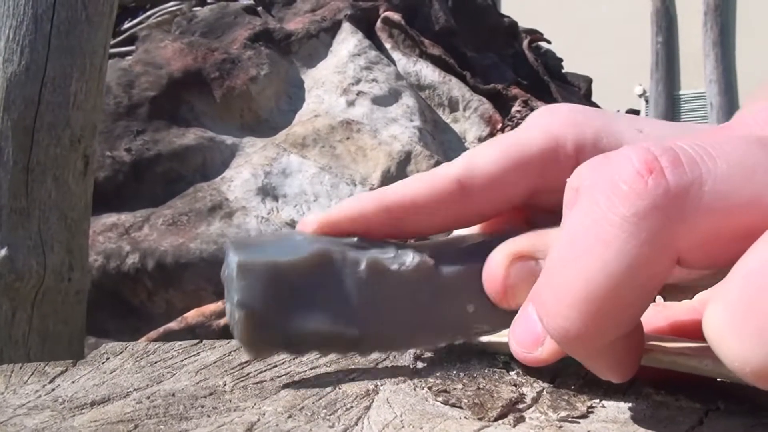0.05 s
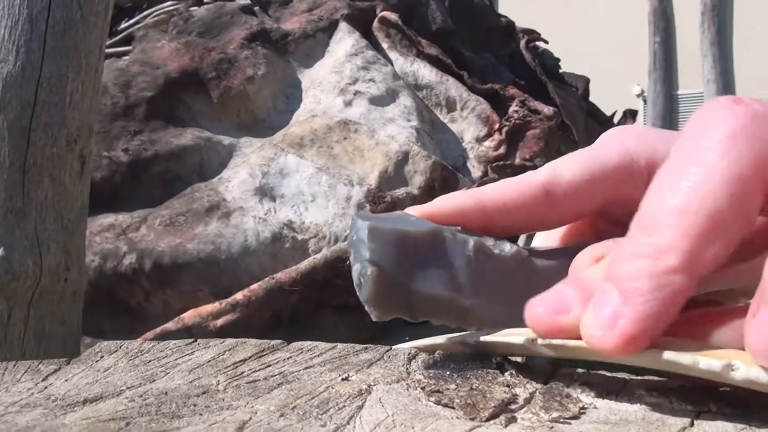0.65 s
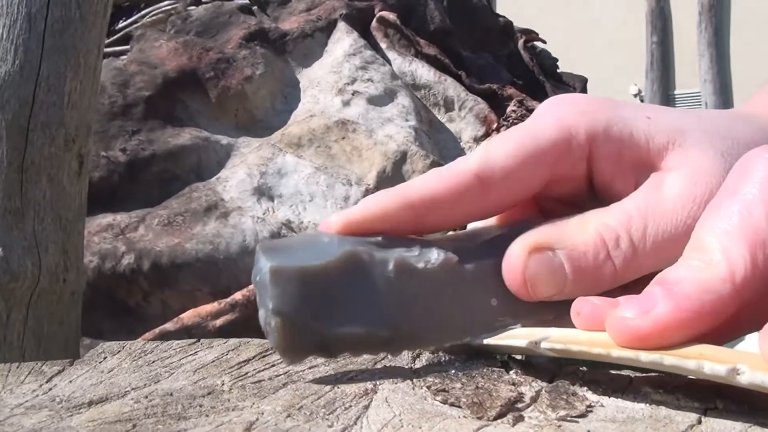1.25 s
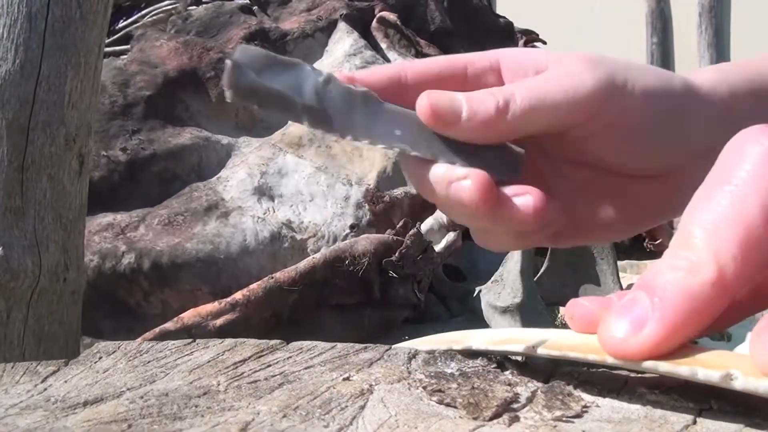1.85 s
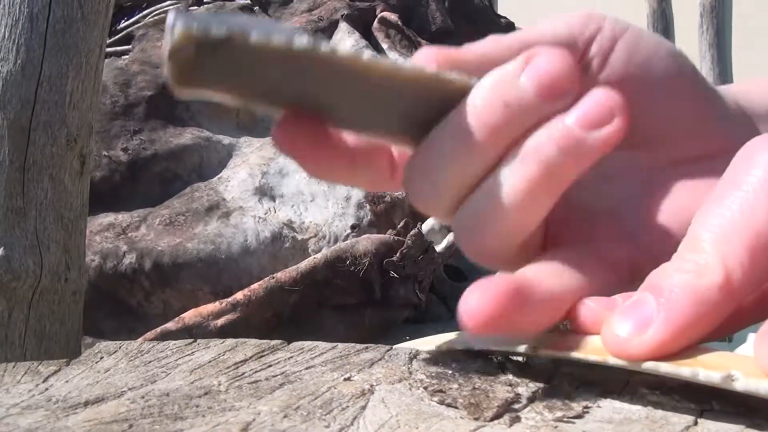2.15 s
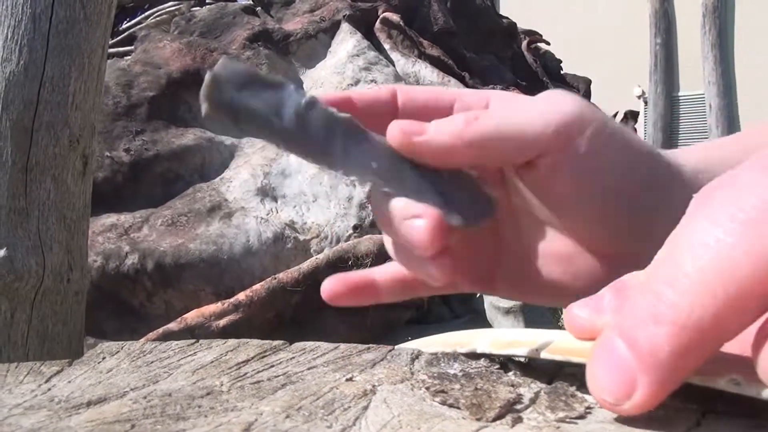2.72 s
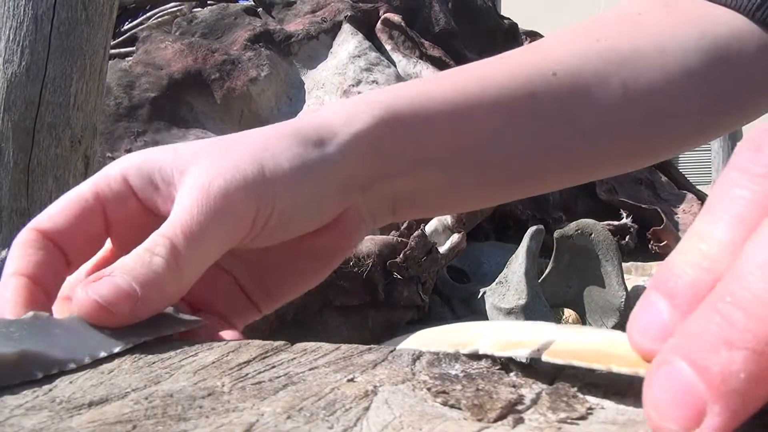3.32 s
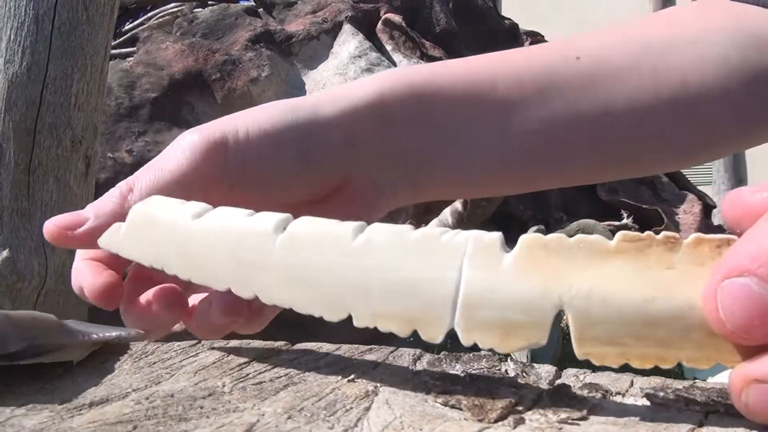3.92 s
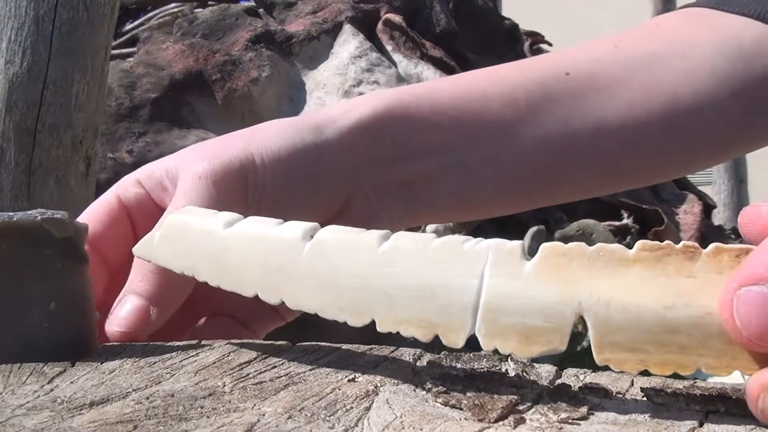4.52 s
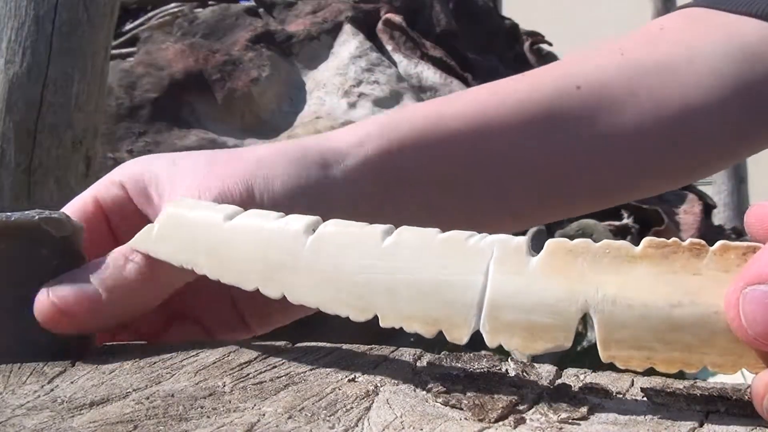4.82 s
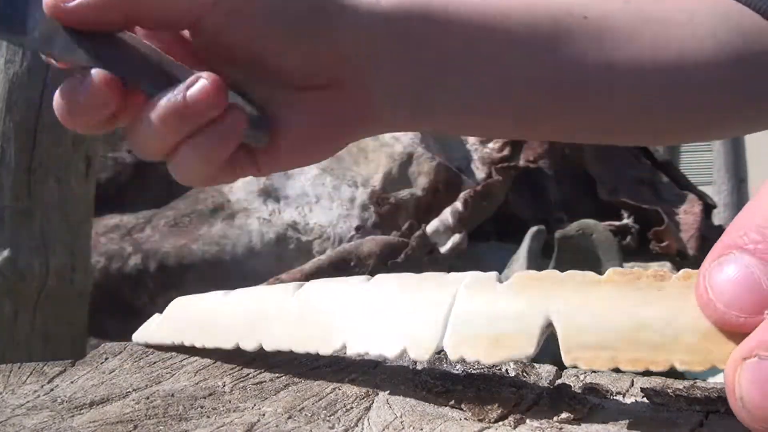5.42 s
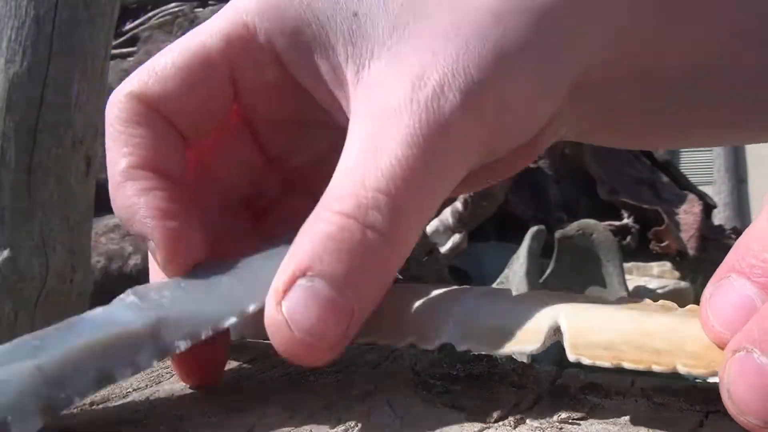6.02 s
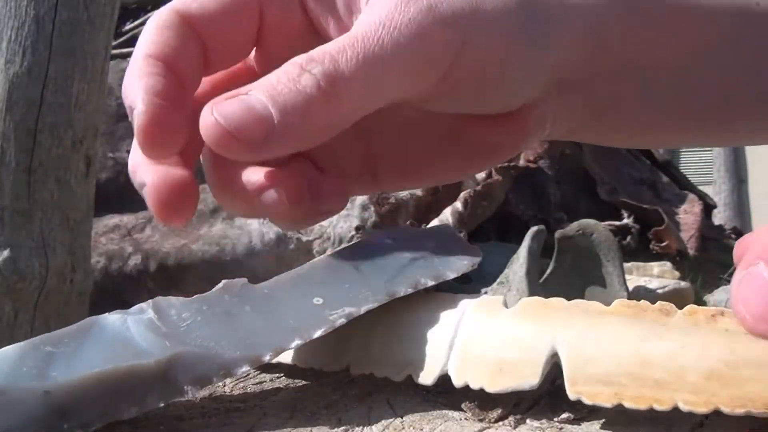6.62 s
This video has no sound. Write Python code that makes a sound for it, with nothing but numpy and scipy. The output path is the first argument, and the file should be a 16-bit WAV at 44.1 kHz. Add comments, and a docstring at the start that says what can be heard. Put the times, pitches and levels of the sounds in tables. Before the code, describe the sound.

A toothed flint blade saws a thin strip on a tree stump, heard close up over a quiet outdoor hush. From the start, about ten quick, gritty rasps snag and tear, with a brief pause near 0.7 seconds, ending at about 1.8 seconds. Faint rubbing of fingers on stone, dull hand bumps and scattered small ticks follow. From 3 seconds the blade clicks down on the wood and rocks to rest. Between 3.8 and 4.3 seconds it is dragged over the stump, juddering with grit, short woody groans and thin high squeaks. A strong hollow knock comes at about 5 seconds, and another knock with a sharp stone click near 5.5 seconds. Light ticks and faint squeaks continue, then the blade is set down with a cluster of sharp clicks and light knocks around 6.2 to 6.3 seconds.

```python
"""A toothed flint blade saws a thin strip held on a tree stump, outdoors.
In about ten quick strokes its teeth snap fibres, which makes the blade rasp. Then the blade is
lifted, laid down, dragged juddering over the stump, picked up and set down again.
The stone ticks and squeaks, fingers rub it, and the stump answers knocks with a short hollow note."""
import sys
import numpy as np
from scipy import signal
from scipy.fft import irfft
from scipy.io import wavfile
from scipy.ndimage import uniform_filter1d

SR = 44100
rng = np.random.default_rng(int(sys.argv[2]) if len(sys.argv) > 2 else 0)


def pcm_store(signal):
    """Save signal as 16-bit PCM."""
    levels = np.round(np.clip(np.atleast_2d(signal), -1, 1) * 32767)
    wavfile.write(sys.argv[1], SR, levels.astype(np.int16).T)


N = 293695
TIME = np.arange(N) / SR
BINS = np.fft.rfftfreq(4096, 1 / SR)


def amp(db):
    """Turn decibels into a gain."""
    return 10 ** (np.asarray(db) / 20)


def unit(x):
    """Scale a signal to an average power of 1."""
    return x / np.sqrt(np.mean(x ** 2) + 1e-20)


def curve(points):
    """Join (frequency, value) points into a curve over BINS."""
    hz, value = np.transpose(points)
    return np.interp(np.log(BINS + 1), np.log(hz + 1), value)


def add(mix, start, sound):
    """Mix in a sound at a start time in seconds."""
    part = mix[max(round(start * SR), 0):][:len(sound)]
    part += sound[:len(part)]


def through(x, response):
    """Let a signal set an object ringing."""
    return signal.oaconvolve(x, response)[:len(x)]


def fade(rows, column=1):
    """Gain that follows a table's dB column over time, silent before and after."""
    times, db = np.array(rows)[:, [0, column]].T
    gain = amp(np.interp(TIME, times, db)) * (TIME >= times[0]) * (TIME <= times[-1])
    return uniform_filter1d(gain, size=130)


def body(colour, notes=(), tilt_db=0):
    """How an object answers one click: a broad tone colour with ringing notes on top."""
    lift = 1 + sum((amp(db) ** 2 - 1) / (1 + (2 * (BINS - hz) / width) ** 2) for hz, width, db in notes)
    gain = amp(curve(colour) + tilt_db * np.log2(np.maximum(BINS, 700)))
    gain *= np.sqrt(np.maximum(lift, 1e-3))
    log_gain = np.log(np.r_[gain, gain[-2:0:-1]] / gain.max() + 1e-5)
    spectrum = np.exp(signal.hilbert(log_gain).conj())  # nothing rings before the click
    response = np.fft.ifft(spectrum).real[:len(BINS)]
    return response / np.linalg.norm(response)


def grains(count, per_s, spread_db):
    """Tiny clicks of random size at random moments."""
    chance, size, sign = rng.random((count, 3)).T
    return (chance < per_s / SR) * amp(spread_db * np.minimum(-np.log(1 - size), 3)) * np.sign(sign - .5)


def waver(count, hz):
    """A random wobble that changes about hz times a second."""
    knots = rng.standard_normal(N // 20)
    return np.interp(np.arange(count) * hz / SR, np.arange(len(knots)), knots) * np.sqrt(3 / 2)


# saw strokes: t/s, length/s, rise/s, level/dB, change over the stroke/dB, push on wood/dB, edge bite/dB
SAW_STROKES = [ (.002, 0.084, 0.017, -20, -3.5, 6, 0.5), (0.134, 0.081, 0.0044, -22, 2.5, 7.5, -4),
               (0.272, 0.099, 0.013, -21.5, 1, 3, -1), (0.408, 0.092, 0.024, -21, 2, 7, -2),
               (0.546, 0.073, 0.016, -27.5, 0.5, -1.5, -3.5), (0.624, 0.14, .004, -38, -9, 8, 0),
               (0.893, 0.076, 0.0084, -25.5, -2, 5, 0), (1.02, 0.084, 0.025, -20, 0, 7, -3),
               (1.126, 0.013, 0.0048, -23.5, -2.5, 8, -3.5), (1.192, 0.091, 0.0054, -13.5, -8, 1, -3.5),
               (1.338, 0.09, 0.031, -15, -5.5, 7.5, -3.5), (1.647, 0.041, 0.037, -20.5, 1.5, 3.5, -14),
               (1.704, 0.015, 0.0022, -21, 1, -5.5, 4.5)]


def strokes(fibre_stop_s=.075, edge_stop_s=.049, wood_stop_s=.13):
    """The force on fibres, edge and wood: each stroke builds up; the edge lets go first, the wood last."""
    fibre, edge, wood = np.zeros((3, N))
    creep = signal.windows.tukey(int(1.76 * SR), .1)  # between strokes the blade creeps in its groove
    add(fibre, 0, amp(-44.5) * creep)
    add(wood, 0, amp(-53) * creep)
    t = TIME[:SR // 3]
    for start, length, rise, db, change_db, wood_db, edge_db in SAW_STROKES:
        effort_db = db - 16 * np.maximum(1 - t / rise, 0) + change_db * np.minimum(t / length, 1)
        fall = 60 * np.maximum(t - length, 0)  # 60 dB down after each stop time
        add(fibre, start, amp(effort_db - fall / fibre_stop_s))
        add(edge, start, amp(effort_db + edge_db - fall / edge_stop_s))
        add(wood, start, amp(effort_db + wood_db - fall / wood_stop_s))
    return uniform_filter1d(np.array([fibre, edge, wood]), size=130, axis=1)


def catches(typical_per_s=45, relax_s=.0017):
    """Gain that jumps as each tooth catches, at an uneven pace, and relaxes."""
    teeth = np.cumsum(typical_per_s * np.exp(.32 * waver(N, typical_per_s))) / SR
    return 1 + amp(2.5) * np.exp(-(teeth % 1) / typical_per_s / relax_s)


# a tooth snags hard and tears free: t/s, level/dB, edge bite/dB
TOOTH_SNAGS = [(.043, -16, -16), (.083, -19, 7.5), (.144, -20, -12), (.185, -10, -1), (.228, -11, -7.5),
               (.288, -26, 16), (.324, -12, -15.5), (.457, -19, -2), (.502, -14.5, -6), (.579, -12.5, -2),
               (.590, -14.5, 3), (.631, -32, 4), (.662, -20.5, -13.5), (.896, -21.5, -3.5), (.948, -26, 3),
               (.991, -45, 14.5), (1.062, -12.5, -3.5), (1.084, -13, -1.5), (1.100, -11, -8.5),
               (1.152, -25.5, 10), (1.227, -18.5, 6.5), (1.2913, -19.5, 11.5), (1.385, -8, -4.5),
               (1.407, -11, -3.5), (1.435, -11.5, -6.5), (1.473, -16.5, 3), (1.517, -22.5, 9.5),
               (1.598, -34.5, 3.5), (1.622, -31.5, 2), (1.6785, -16.5, -1.5), (1.707, -12.5, -0.5)]
# tone colours of the rasp and of the stump under it: f/Hz, level/dB
RASP_COLOUR = [(500, -16), (850, 8.5), (926, -19), (1050, 3), (1270, 2.5), (2320, 0.5), (3690, -10),
               (4770, -10), (5590, -12.5), (7490, -18), (10300, -22.5), (15800, -40.5)]
WOOD_COLOUR = [(32, -26), (105, -18), (230, -9), (340, -13.5), (460, -6.5), (620, -6), (840, -0.5),
               (1120, -28.5), (2100, -45.5)]
# notes of the blade pressed on the strip, and of the hollow-sounding stump: f/Hz, width/Hz, boost/dB
BLADE_NOTES = [(1028, 38, 8.5), (2040, 160, 2), (2190, 110, -3), (4710, 360, 10.5), (10240, 200, 6)]
WOOD_NOTES = [(566, 20, 17), (780, 28, 6.5)]


def sawing(tear_s=.0021, split_hz=3400):
    """Teeth snap fibres in clumps; the snaps ring the blade and, through the strip, the stump."""
    snaps = grains(N, per_s=9500, spread_db=3.5)
    clumps = amp(4 * waver(N, hz=310))
    fibre, edge, wood = amp([[-3.5], [-4], [-3.5]]) * unit(snaps * clumps * catches()) * strokes()
    age = TIME[:SR // 30] / tear_s
    for start, db, bite_db in TOOTH_SNAGS:
        tear = grains(len(age), per_s=12500, spread_db=-.5) * (age + .5) * np.exp(-2 * age)
        tear *= amp(db - 3) * np.sqrt(tear_s * SR) / np.linalg.norm(tear)
        add(fibre, start, tear)
        add(edge, start, amp(bite_db) * tear)
        add(wood, start, amp(-bite_db / 2) * tear)  # a glancing bite pushes the wood less
    rasp = body(RASP_COLOUR, BLADE_NOTES)
    out = through(wood, body(WOOD_COLOUR, WOOD_NOTES))
    for force, band in ((fibre, "low"), (edge, "high")):
        part = signal.sosfilt(signal.butter(3, split_hz, band, fs=SR, output="sos"), rasp)
        out += through(force, part / np.linalg.norm(part))
    return out


# tone colour of the outdoor background: f/Hz, level/dB
AIR_COLOUR = [(25, -37), (55, -1.5), (110, -1.5), (250, -8.5), (560, -7), (1100, -14), (2500, -16.5),
              (5000, -25), (8000, -26.5), (15800, -31)]


def air(level_db=-54):
    """A quiet outdoor hush with a faint low drone, partly shared by left and right."""
    shared, left, right = rng.standard_normal((3, N))
    colour = body(AIR_COLOUR, notes=[(73, 12, 8)])
    pair = np.array([through(shared + own, colour) for own in (left, right)]) * amp([[-2], [1.5]])
    return amp(level_db) * pair / pair.mean(0).std()


# the hands bump the stump: t/s, level/dB
HAND_BUMPS = [(0.628, -28.5), (.69, -25), (.724, -26), (.21, -27), (0.331, -26), (.47, -28), (1.215, -24.5),
              (1.289, -20), (1.504, -26), (1.534, -29), (1.805, -22), (1.898, -38.5), (2.212, -32),
              (2.569, -35.5), (2.656, -32.5), (3.069, -27), (3.176, -41), (4.157, -29), (4.233, -20.5),
              (4.443, -34.5), (4.651, -34), (4.721, -35.5)]
# tone colour of a bump: f/Hz, level/dB
THUD_COLOUR = [(26, -33), (72, 3), (125, -1.5), (265, 3.5), (410, -16.5), (880, -11), (2400, -40.5)]


def bumps(die_away_s=.14):
    """Soft, dull pushes of the hands die quickly in the heavy stump."""
    out, t, dull = np.zeros(N), TIME[:SR // 8], body(THUD_COLOUR)
    for start, db in HAND_BUMPS:
        push = rng.standard_normal(len(t)) * amp(-60 * t / die_away_s)
        add(out, start, amp(db - 7) * unit(through(push, dull)) / 2)
    return out


# fingers rub the stone, in a pause of the saw and after the sawing: t/s, level/dB
PAUSE_RUB = [(.66, -40.5), (.82, -56), (1.0, -59)]
LATER_RUB = [(1.86, -48), (2.0, -66.5), (2.27, -61), (2.4, -57), (2.77, -51), (3.08, -54), (3.87, -56.5),
             (4.02, -48), (4.09, -48.5), (4.23, -53.5), (4.46, -51), (4.82, -53), (4.96, -59), (5.25, -56),
             (5.62, -56), (6.05, -71), (6.21, -51), (6.62, -67)]
# tone colour of the rubbing: f/Hz, level/dB
RUB_COLOUR = [(330, 4.5), (1400, 0.5), (3000, -3), (4800, -5), (6000, -9), (9000, -20.5), (15800, -22.5)]
# notes of the rubbed blade: f/Hz, width/Hz, boost/dB
RUB_NOTES = [(4640, 300, 5), (10280, 250, 5)]


def rubbing():
    """Skin slides on the stone with a faint, fluttering hiss, in which the blade rings a little."""
    skin = unit(grains(N, per_s=9500, spread_db=5.5)) * amp(5 * waver(N, hz=26))
    return through(skin * (fade(PAUSE_RUB) + fade(LATER_RUB)), body(RUB_COLOUR, RUB_NOTES))


# stone knocks on the stump, and the strip taps it: t/s, level/dB, hardness/dB per octave
STUMP_KNOCKS = [(1.473, -31, 18), (1.517, -40, 25.5), (2.214, -36, 10), (2.28, -33, 6),
                (3.070, -32.5, 15.5), (3.120, -38.5, -11), (3.291, -26, 9), (3.299, -19, -3.5),
                (3.447, -33, 2), (3.921, -13.5, -8), (4.158, -33.5, 10), (4.211, -22, -16),
                (4.256, -27, 14), (4.652, -35.5, 10), (4.717, -27.5, 11.5), (4.943, -26.5, -3),
                (4.959, -25.5, -22), (4.98, -5.5, -8), (5.4647, -17, 11.5), (5.478, -21, 6),
                (5.700, -33, -4), (5.815, -30.5, 8), (6.100, -37, 10), (6.161, -37, -6), (6.228, -24.5, 6),
                (6.279, -37, 8), (6.316, -28, 13)]
STRIP_TAPS = [(1.473, -42, 16), (2.480, -44, -3), (2.569, -43, 4.5), (2.658, -40, 6), (2.683, -28.5, -3),
              (3.070, -39.5, 8.5), (3.447, -36.5, 8.5), (4.716, -30, -4), (5.4647, -38, 17)]
# notes of the struck stump and strip: f/Hz, level/dB, time to fade by 60 dB/s
STUMP_NOTES = [(411, -13.5, 0.089), (548, -0.5, 0.14), (572.8, -5.5, 0.13), (644, -11, 0.082),
               (862, -18.5, 0.11), (942.6, -9, 0.033), (1490, -22.5, 0.025), (1850, -26.5, 0.024)]
STRIP_NOTES = [(670, -5, .07), (787, 3, 0.077), (1030, -15.5, .04), (1420, -6, 0.01), (1780, -7, 0.023)]


def knocks(blows, notes, gain_db, swell_cycles=1.7):
    """Each blow rings an object's notes, which swell and fade; harder blows favour the high ones."""
    out, t = np.zeros(N), TIME[:SR // 4]
    for start, db, hardness_db in blows:
        for hz, note_db, fade_s in notes:
            ring = amp(note_db + hardness_db * np.log2(hz / 550) - 60 * t / fade_s)
            swell = 1 - np.exp(-t * hz / swell_cycles)
            add(out, start, amp(db + gain_db) * ring * swell * np.sin(2 * np.pi * hz * t))
    return out


# the flint ticks and scratches: t/s, level/dB, slide length/s, brightness/dB per octave
FLINT_TICKS = [(1.833, -29, 0.0022, 9), (2.226, -39.5, 0.056, 5.5), (2.268, -22.5, 0.02, 2),
               (2.458, -39, 0.0023, 10.5), (2.569, -34.5, 0.0085, -6.5), (2.660, -43.5, 0.075, 7),
               (2.8, -44.5, 0.0046, -4), (3.071, -34, 0.0044, .5), (3.290, -35, .016, -7.5),
               (3.336, -36, 0.0038, 9.5), (3.348, -27.5, 0.0024, 0.5), (3.414, -30, 0.0053, 4),
               (3.447, -23, 0.0024, 7), (3.45, -25.5, .012, -2), (4.941, -40.5, 0.023, -5),
               (5.4655, -19.5, 0.00075, -2), (5.478, -32, 0.0013, 9), (5.696, -35, 0.009, 5),
               (5.813, -30, 0.0094, 3), (6.032, -36.5, 0.0015, -0.5), (6.2288, -9, 0.0013, -0.5),
               (6.272, -37, 0.05, -5.5), (6.28, -24.5, .003, 0), (6.292, -26.5, .002, 7),
               (6.314, -18, 0.0011, 9.5), (6.318, -22.5, 0.011, 3.5)]
# tone colour of the loose blade: f/Hz, level/dB
FLINT_COLOUR = [(110, -12), (620, -5.5), (1750, -3), (3400, -2.5), (5700, -6.5), (8100, -18), (12100, -24),
                (15900, -30.5)]
# its notes: f/Hz, width/Hz, boost/dB
FLINT_NOTES = [(3428, 140, 7.5), (4510, 33, 6.5), (5120, 124, 6.5), (5880, 220, 3), (7180, 160, 3.5)]


def ticks():
    """A sharp touch and a short gritty slide ring the loose blade."""
    out = np.zeros(N)
    for start, db, length, bright_db in FLINT_TICKS + stray_ticks():
        slide = grains(SR // 10, per_s=8600, spread_db=6.5)[:max(int(length * SR), 2)]
        slide[0] += 3  # the first touch
        tick = signal.fftconvolve(slide, body(FLINT_COLOUR, FLINT_NOTES, bright_db))
        tick *= np.sqrt((length + .00052) * SR) / np.linalg.norm(tick)  # longer slides carry more energy
        add(out, start, amp(db - 1) * tick)
    return out


# the fingers shift their grip: from t/s, to t/s
GRIP_SHIFTS = [(2.3, 3.55), (5.601, 7.2)]


def stray_ticks(per_s=6, slide_s=.0027, bright_db=8):
    """Extra rows for ticks(): faint touches at random moments while the grip shifts."""
    return [(start + when * (end - start), -38.5 - 10 * softness, slide_s, bright_db)
            for start, end in GRIP_SHIFTS
            for when, softness in rng.random((40, 2))[:int(per_s * (end - start))]]


def slip(hz, jitter_hz, shimmer_db, overtone_db):
    """Sticking and slipping in quick turns makes an unsteady, nearly pure tone."""
    phase = 2 * np.pi * np.cumsum(hz + jitter_hz * waver(len(hz), 300)) / SR
    wave = np.sin(phase) + amp(overtone_db) * np.sin(2 * phase)
    return unit(wave * amp(shimmer_db * waver(len(hz), 200)))


# the slips lock on to a note of the stump: t/s, length/s, f/Hz, level/dB
GROANS = [(3.297, 0.013, 569, -18), (3.469, 0.032, 543, -28), (3.84, 0.066, 557, -25),
          (3.912, 0.054, 575, -24), (3.973, 0.22, 558, -35.5), (4.081, 0.061, 572, -16.5),
          (4.147, 0.029, 550, -19), (4.231, 0.0321, 566.6, -10)]
# the dragged blade judders: t/s, f/Hz, level/dB
JUDDER = [(3.834, 401, -34.5), (3.873, 384.6, -34), (3.963, 379.6, -32.5), (4.043, 406.5, -41.5),
          (4.121, 381.6, -30.5), (4.135, 402, -46)]
# grit under the sliding blade: t/s, level/dB
GRIT = [(3.825, -48), (3.837, -35), (3.927, -35.5), (4.061, -53.5), (4.105, -34.5), (4.157, -40),
        (4.199, -55), (4.255, -24), (4.295, -65)]
# its tone colour: f/Hz, level/dB
GRIT_COLOUR = [(40, -30), (105, -11), (390, 9.5), (760, 7), (1350, -8.5), (2050, -2), (2900, -20.5),
               (4400, -17), (6900, -22), (9100, -41.5), (15900, -44)]
# the notes it rings: f/Hz, width/Hz, boost/dB
GRIT_NOTES = [(966, 61, 8), (4460, 75, 17), (11100, 160, 0.5)]


def dragging():
    """The blade judders over the wood and grinds grit; now and then the stump groans."""
    times, slip_hz, _ = np.transpose(JUDDER)
    judder = slip(np.interp(TIME, times, slip_hz), jitter_hz=4.87, shimmer_db=-1, overtone_db=-17)
    out = amp(8.5) * fade(JUDDER, column=2) * judder
    for start, length, hz, db in GROANS:
        count = int(length * SR)
        groan = slip(np.full(count, hz), jitter_hz=23.2, shimmer_db=2.5, overtone_db=-41)
        add(out, start, amp(db) * signal.windows.tukey(count, .28) * groan)
    grit = unit(grains(N, per_s=7800, spread_db=1.5)) * fade(GRIT)
    return out + amp(3.5) * through(grit, body(GRIT_COLOUR, GRIT_NOTES))


def rocking(start_s=3.549, gap_s=.047, jitter_s=.0073, loss_db=1.4, spread_db=8):
    """Extra rows for knocks(): the blade, let go, rocks to rest in six uneven knocks."""
    return [(start_s + k * gap_s + jitter_s * late, -28 - k * loss_db + spread_db * loud, 0)
            for k, (late, loud) in enumerate(rng.uniform(-1.06, 1, (6, 2)))]


# the sliding blade squeaks: t/s, length/s, level/dB
SQUEAKS = [(3.812, 0.18, -47.5), (4.076, 0.13, -47), (4.211, 0.047, -31.5), (5.293, 0.063, -52.5),
           (5.468, 0.2, -56), (5.722, 0.13, -59), (6.027, 0.084, -53)]
# tone colour of a squeak: f/Hz, level/dB
SQUEAK_COLOUR = [(1000, -8), (4500, 1), (10000, -18.5), (15000, -23)]
# its notes: f/Hz, width/Hz, boost/dB
SQUEAK_NOTES = [(4550, 17, 33.5), (10120, 110, 28.5), (12400, 120, 16)]


def squeaking():
    """Fine friction swells and fades unevenly, ringing the blade's thin, high notes."""
    swell = np.zeros(N)
    for start, length, db in SQUEAKS:
        add(swell, start, amp(db) * signal.windows.tukey(int(length * SR), .6))
    friction = unit(rng.standard_normal(N) * amp(4 * waver(N, hz=35)))
    return through(swell * friction, body(SQUEAK_COLOUR, SQUEAK_NOTES))


# how far the wave at the left microphone is ahead of the right: f/Hz, lead/rad
LEFT_LEAD = [(0, 0), (1210, 1.5), (2070, 0.7), (3960, 0.5), (10300, -0.7), (14600, 0.5), (16100, -4.5)]
# left-right balance of the sawing and of the handling: f/Hz, left minus right/dB
SAW_BALANCE = [(60, -10.5), (110, -11), (200, -6.5), (380, -6.5), (700, -2.5), (1290, -1), (2380, -3),
               (8120, -1), (15000, -6)]
HANDLING_BALANCE = [(60, -15), (110, -13), (200, -7), (380, -7), (700, -3.5), (1290, 1), (2380, -1),
                    (8120, -.5), (15000, -8.5)]


def stereo(x, balance, echo_db=-5.5, echo_fade_s=.022):
    """Two close microphones each hear the sound a little differently, plus echoes off nearby things."""
    half = amp(curve(balance) / 2) * np.exp(.5j * curve(LEFT_LEAD) * (BINS < 14000))
    pair = np.array([half, 1 / half])
    pair /= np.maximum(abs(pair.mean(0)), .5)
    response = np.fft.fftshift(irfft(pair), axes=1)
    direct = signal.oaconvolve(x[None], response, axes=1)[:, len(BINS) - 1:][:, :N]
    t = TIME[:SR // 16]
    echoes = rng.standard_normal((2, 2, len(t))) * amp(-60 * t / echo_fade_s) * (t > .0006)
    echoes = signal.lfilter(*signal.butter(2, 900, "high", fs=SR), echoes)  # small things echo no bass
    echoes *= amp(echo_db) / np.linalg.norm(echoes, axis=-1, keepdims=True)
    pose = 2 * waver(N, hz=5)  # moving hands blend between two echo patterns
    return direct + np.array([through(x * np.cos(pose), a) + through(x * np.sin(pose), b)
                              for a, b in echoes])


def scene():
    """The sawing and the handling of the blade, over the outdoor air."""
    stump = knocks(STUMP_KNOCKS + rocking(), STUMP_NOTES, gain_db=2.5)
    strip = knocks(STRIP_TAPS, STRIP_NOTES, gain_db=5.5)
    handling = stump + strip + bumps() + ticks() + dragging() + rubbing() + squeaking()
    return stereo(sawing(), SAW_BALANCE) + stereo(handling, HANDLING_BALANCE) + air()


def record(dry):
    """Round off the loudest peaks, then cut the treble above 16 kHz."""
    rounded = dry / (1 + dry ** 6) ** (1 / 6)
    lowpass = signal.firwin(255, 16000, window=("kaiser", 9), fs=SR)
    return signal.oaconvolve(rounded, lowpass[None], "same")


dry = scene()
out = record(dry)
pcm_store(out)
```